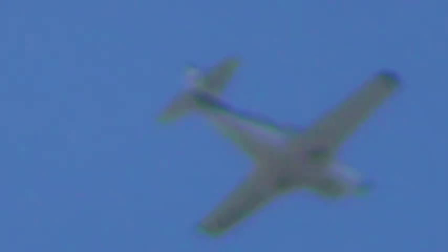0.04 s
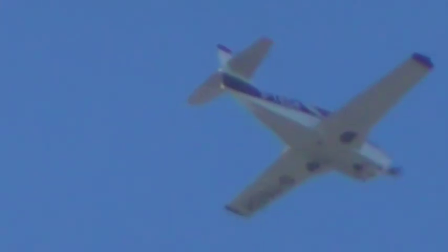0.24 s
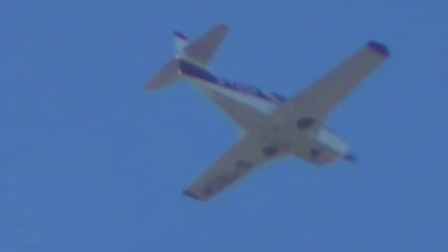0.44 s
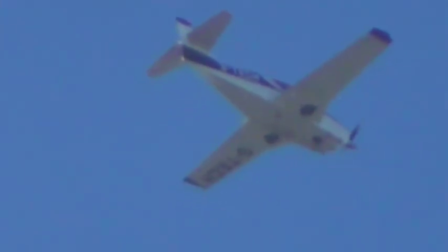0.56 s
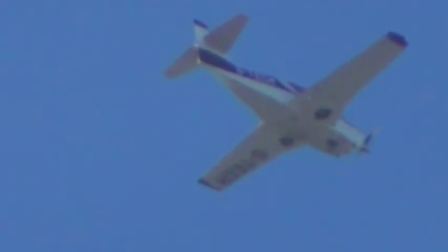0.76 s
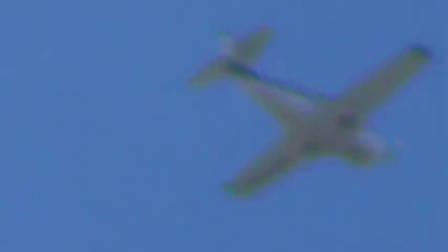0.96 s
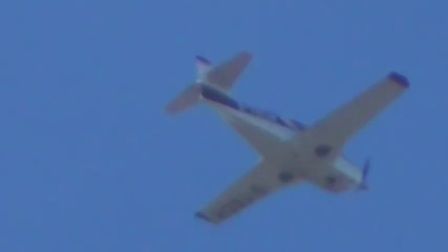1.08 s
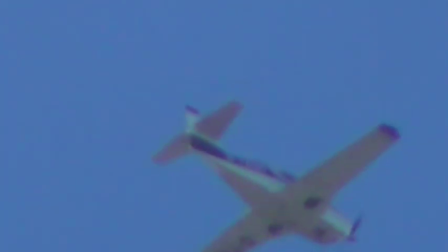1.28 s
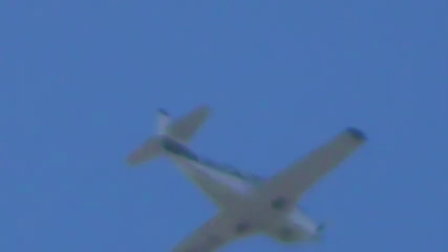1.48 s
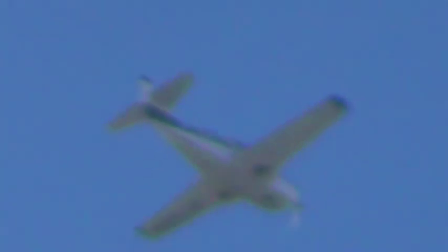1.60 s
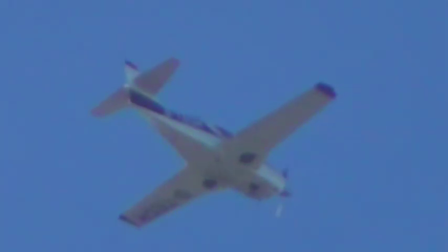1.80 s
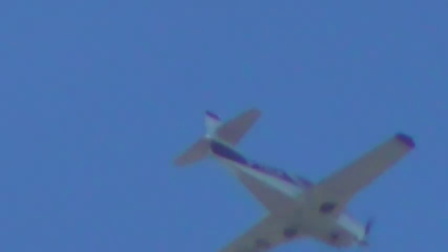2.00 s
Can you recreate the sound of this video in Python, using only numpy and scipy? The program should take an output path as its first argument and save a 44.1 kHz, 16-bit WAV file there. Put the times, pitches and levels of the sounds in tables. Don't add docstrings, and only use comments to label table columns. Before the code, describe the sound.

A small piston propeller plane drones overhead throughout, a nearly constant low buzzing hum with a broad, soft roar, barely dropping in pitch. Wind thumps and rumbles against the camera microphone, strongest from 0 to 0.6 seconds, with another burst around 0.85 to 1.1. Afterwards the drone stands clear, with small low bumps near the end at 2 seconds. Faint lens motor ticks, leaf hiss and electronic hiss lie underneath.

```python
import sys
import numpy as np
from scipy import signal
from scipy.fft import rfft, irfft, next_fast_len
from scipy.io import wavfile
from scipy.ndimage import uniform_filter1d, map_coordinates

SR = 44100
rng = np.random.default_rng(int(sys.argv[2]) if len(sys.argv) > 2 else 0)


def field_ratio(decibels):
    return 10 ** (np.asarray(decibels, dtype=float) / 20)


def int16_out(signal):
    q = np.round(np.clip(np.atleast_2d(signal).T, -1, 1) * 32767)
    wavfile.write(sys.argv[1], SR, q.astype(np.int16))


N = 89964
TIME = np.arange(N) / SR

# pitch_hz, level_db per Hz
HISS_COLOR = [(3000, -30), (6500, 0.5), (8000, 3), (11000, -1), (16000, -2.5)]
# start_s, level_db
LEAF_LEVEL = [(0, -71), (.55, -69), (.72, -65), (.78, -63), (.83, -64.5), (.9, -60), (.97, -61),
              (1.02, -62), (1.08, -65), (1.2, -62.5), (1.33, -62.5), (1.4, -63), (1.6, -67.5), (1.9, -65.5),
              (2.04, -61)]
# pitch_hz, level_db per Hz
LEAF_COLOR = [(2000, -23), (3500, -7.5), (5500, -10), (7500, -11), (9000, -20), (12000, -28), (16000, -52)]

# start_s, dull_peak_db, bright_peak_db
MOTOR_KNOCKS = [(.0503, -49, -66), (.1745, -48, -68), (.194, -47, -66), (.2184, -51, -61), (.24, -48, -63),
                (.2795, -41, -63), (.2985, -51, -63), (.319, -41, -63), (.34, -56, -61), (.3594, -47, -62),
                (.379, -55, -60), (.3975, -54, -61), (.4184, -54, -60), (.5217, -57, -61),
                (.5931, -49, -63), (.6185, -50, -60), (.7355, -47, -65), (.8483, -48, -66),
                (.8887, -47, -60), (.9303, -43, -62), (.95, -49, -62), (.97, -49, -64), (1.01, -44, -56),
                (1.0303, -39, -57), (1.0494, -51, -60), (1.1882, -54, -56), (1.4202, -52, -58),
                (1.5065, -53, -59), (1.608, -50, -58), (1.9644, -56, -50), (2.0073, -52, -56)]
# dull_peak_db, bright_peak_db
STEP_LEVELS = [-58, -69]
# pitch_hz, level_db
BODY_MODES = [(2100, -7), (2600, -7), (3100, -9), (3550, -9), (4000, -11), (4500, -16), (5100, -19)]
# pitch_hz, level_db
SHELL_MODES = [(5800, -13), (6500, -10), (7400, -8), (8200, -11), (9300, -16)]

# start_s, large_eddy_level_db, deep_swell_over_that_db
GUSTS = [(0.0, -38, 7), (0.04, -28, -12), (0.15, -26.5, -9), (0.21, -20, -17), (0.36, -32, -3),
         (0.43, -35, -19), (0.48, -22.5, -9), (0.57, -24, -11), (0.61, -55, 11), (0.65, -36, -27),
         (0.68, -52, -17), (0.94, -32, -17), (1.42, -45.5, -24), (1.68, -37.5, -8), (1.74, -38, -19),
         (1.98, -41, -7), (2.0, -46, -20), (2.04, -54, -6)]
# pitch_hz, level_db per Hz
SWELL_COLOR = [(10, -11), (25, -17), (42, -12), (60, -7.5), (100, -32), (200, -90)]
RUMBLE_COLOR = [(30, -36), (55, -5), (80, 4), (140, -4), (220, -12), (400, -28.5), (1000, -61), (2000, -90)]
FLUTTER_COLOR = [(40, -23), (100, 0.5), (180, 0.5), (300, -2), (500, -8), (800, -20.5), (1500, -29),
                 (3000, -95)]
# center_s, level_db, width_s
PUFFS = [(.05, -36, 0.15), (.145, -26, 0.047), (.22, -26, 0.031), (.29, -28.5, 0.095), (0.339, -30, 0.035),
         (.45, -28, 0.028), (.505, -31.5, 0.038), (0.559, -21.5, 0.073), (.66, -37, 0.032),
         (.795, -39, 0.034), (.87, -28, 0.026), (.91, -25, 0.041), (.97, -25.5, 0.11), (1.02, -40, 0.047),
         (1.06, -40, 0.037), (1.135, -25.5, 0.011)]
# center_s, pitch_hz, peak_db
SLAPS = [(0.016, 64, -33), (0.046, 99, -25.5), (0.081, 112, -25.5), (0.107, 145, -26.5),
         (0.118, 69, -27.5), (0.143, 133, -25.5), (0.145, 53, -31), (0.159, 231, -28.5),
         (0.188, 113, -23), (0.218, 91, -20.5), (0.244, 79, -29), (0.263, 137, -24.5),
         (0.297, 172, -29), (0.312, 113, -26), (0.329, 52.5, -29.5), (0.335, 172, -29),
         (0.337, 243, -27.5), (0.376, 170, -31.5), (0.39, 118, -29), (0.432, 85.2, -33),
         (0.445, 140, -25.5), (0.448, 214, -33), (0.498, 118, -30.5), (0.5, 193, -36),
         (0.516, 284, -35), (0.538, 96, -33), (0.55, 276, -22.5), (0.567, 131, -25),
         (0.658, 123, -32.5), (0.753, 156, -29), (0.803, 152, -36), (0.867, 175, -35),
         (0.896, 115, -29.5), (0.906, 253, -28.5), (0.91, 341, -29.5), (0.925, 106, -30.5),
         (0.955, 167, -28), (0.964, 282, -32), (1.006, 180, -26.5), (1.012, 242, -28),
         (1.028, 145, -26), (1.056, 218, -38), (1.189, 139, -34.5), (1.666, 150, -37),
         (1.72, 158, -39), (1.77, 159, -36), (1.933, 154, -30), (2.003, 102, -32),
         (.025, 130, -27), (0.051, 304, -37), (.062, 70, -30), (.09, 75, -31), (.23, 170, -33.5),
               (.99, 190, -29), (1.042, 170, -37), (1.062, 238, -33), (.94, 192, -31), (0.099, 298, -35.5),
               (.245, 306, -33), (.58, 190, -26.5), (0.866, 366, -33.5), (0.941, 300, -36),
               (.979, 424, -32.5), (0.986, 233, -31.5), (.72, 268, -36)]

# start_s, cycle_hz
ENGINE_SPEED = [(0, 18.8), (2.04, 18.68)]
# multiple of the engine cycle, level_db
ENGINE_ORDERS = [(3, -20), (4, -5), (5, -12), (6, 0), (7, -2), (8, 4), (9, -1), (10, -11), (11, -4),
                 (12, -3), (13, -10), (14, -11), (15, 1), (16, -3), (20, -8), (29, -10), (34, -10),
                 (37, -8), (40, -11), (54, -13)]
# multiple, center_s, gain_db, half_width_s
FOCUS = [(37, .07, 7, .1), (29, .12, 6, .12), (29, .89, 8, .12), (40, .95, 9, .1), (37, 1.0, 7, .04),
         (54, 1.14, 7, .07), (34, 1.21, 7, .06), (37, 1.22, 10, .05), (37, 1.39, 10, .13),
         (40, 1.48, 10, .05), (34, 1.52, 9, .12), (54, 1.7, 7, .06), (6, .7, 3, .2), (8, 1.7, 4, .3),
         (8, .8, 3, .2)]
# pitch_hz, level_db per Hz
ROAR_COLOR = [(20, -23), (150, 0), (400, -3), (700, -1.5), (1050, -3.5), (1350, -11), (3300, -27.5),
              (7000, -55)]
# pitch_hz, left_minus_right_db
PLANE_BALANCE = [(60, 0), (300, 0), (500, -0.5), (750, 3.5), (1140, 4.5), (1740, 4.5), (2650, 3),
                 (3300, -0.5)]
# pitch_hz, likeness (1 = same)
ROAR_ALIKE = [(100, .97), (500, 0.93), (1500, 0.89), (2200, 0.88), (3300, 1)]


def unit(x):
    return x / np.sqrt(np.mean(x ** 2) + 1e-20)


def along(points, hz):
    f, v = np.transpose(points)
    return np.interp(np.log(hz + 1), np.log(f + 1), v)


def curves(rows):
    s, *columns = np.transpose(rows)
    return [np.interp(TIME, s, column) for column in columns]


def wobble(rate_hz):
    return map_coordinates(rng.standard_normal(400), [np.arange(N) * rate_hz / SR])


def filtered(x, response):
    m = next_fast_len(N + 8192)
    return irfft(rfft(x, m) * response(np.fft.rfftfreq(m, 1 / SR)), m)[..., :N]


def rush(color, alike, patchy_db):
    noise = signal.stft(rng.standard_normal((2, N)), nperseg=512)[2]
    patches = uniform_filter1d(rng.standard_normal(noise.shape[1:]), size=5, axis=0)
    patches = uniform_filter1d(patches, size=10, axis=1)
    pair = signal.istft(noise * field_ratio(patchy_db * unit(patches)), nperseg=512)[1][:, :N]

    def middle_and_side(hz):
        angle = np.arccos(np.clip(along(alike, hz), -1, 1)) / 2
        return field_ratio(along(color, hz)) * [np.cos(angle), np.sin(angle)]

    middle, side = filtered(pair, middle_and_side)
    return unit(np.array([middle + side, middle - side]))


def preamp_hiss():
    return field_ratio(-67.5) * rush(HISS_COLOR, [(7700, 0.96), (8500, 0.45), (12000, 0.2)], patchy_db=-0.5)


def leaves():
    level_db = curves(LEAF_LEVEL)[0] + 0.63 * wobble(11.95)
    return field_ratio(level_db) * rush(LEAF_COLOR, [(7700, 0.99), (8500, 0.32)], patchy_db=1.8)


def knock(modes):
    t = np.arange(800) / SR
    t60_s, rise_s, detune_share = .012, .0006, .035
    shape = field_ratio(-60 * t / t60_s) * (1 - np.exp(-t / rise_s))
    hz, mode_db = np.transpose(modes)[:, :, None]
    detune, scatter_db, phase = rng.standard_normal((3, len(modes), 1))
    pitch_hz = hz * (1 + detune_share * detune)
    ring = field_ratio(mode_db + scatter_db) * np.sin(2 * np.pi * (pitch_hz * t + phase))
    return shape * ring.sum(axis=0)


def lens_motor():
    step_hz, first_step_s, gain_db = 49.9, .0193, 7.5
    steps = [(s, *STEP_LEVELS) for s in np.arange(first_step_s, N / SR, 1 / step_hz)]
    out = np.zeros(N + SR)
    for s, dull_db, bright_db in MOTOR_KNOCKS + steps:
        for db, modes in ((dull_db, BODY_MODES), (bright_db, SHELL_MODES)):
            ring = field_ratio(db + gain_db) * knock(modes)
            out[round(s * SR):][:len(ring)] += ring
    return out[:N]


def slaps():
    gain_db, apart, apart_hz = 2, 0.85, 263
    t = np.arange(-2000, 2000) / SR
    out = np.zeros((2, N + SR))
    for s, hz, db in SLAPS:
        phase, direction = rng.standard_normal(2)
        gap = apart * min(hz / apart_hz, 1) ** 2 * np.sign(direction)
        skew = gap * np.array([[.5], [-.5]])
        life_s = .005 + .6 / hz
        swing = np.exp(-(t / life_s) ** 2) * np.sin(2 * np.pi * (hz * t + phase) + skew)
        out[:, round(s * SR):][:, :len(t)] += field_ratio(db + gain_db) * swing
    return out[:, 2000:2000 + N]


def deep_swell():
    strength_db, deep_db = curves(GUSTS)
    return field_ratio(strength_db + deep_db) * rush(SWELL_COLOR, [(40, 0.9)], patchy_db=-0.5)


def large_eddies():
    calm_db = -43
    strength_db = curves(GUSTS)[0]
    strength = np.sqrt(np.clip(field_ratio(2 * strength_db) - field_ratio(2 * calm_db), 1e-8, None))
    rumble = rush(RUMBLE_COLOR, [(50, 0.94), (300, 0.97)], patchy_db=-1.2)
    return strength * unit(field_ratio(1.2 * wobble(24.9)) * rumble)


def small_eddies():
    power = sum(field_ratio(2 * db) * np.exp(-(2 * (TIME - s) / width_s) ** 2) for s, db, width_s in PUFFS)
    flutter = rush(FLUTTER_COLOR, [(100, 0.65), (500, 0.13)], patchy_db=2.4)
    uneven = unit(field_ratio(1.5 * wobble(40.4)) * flutter)
    return np.sqrt(power) * uneven * field_ratio([[-1.4], [1.4]])


def wind():
    stream_db = -8
    return deep_swell() + field_ratio(stream_db) * (large_eddies() + small_eddies()) + slaps()


def engine_turns():
    return 2 * np.pi * np.cumsum(curves(ENGINE_SPEED)[0]) / SR


def focus_db(k):
    extra_db = 3.5 * (k > 20)
    total_db = 0
    for multiple, s, gain_db, width_s in FOCUS:
        if round(multiple) == k:
            total_db = total_db + (gain_db + extra_db) * np.exp(-((TIME - s) / width_s) ** 2)
    return total_db


def engine():
    turns, tones = engine_turns(), np.zeros(N)
    for k, db in ENGINE_ORDERS:
        level_db = db + focus_db(k) + 0.56 * wobble(3.91)
        phase = 2 * np.pi * rng.random() + 0.14 * wobble(5.7)
        tones += field_ratio(level_db) * np.sin(k * turns + phase)
    return field_ratio(-39.5) * unit(tones)


def propeller_roar():
    throb = 1 + 0.069 * np.sin(2 * engine_turns())
    return field_ratio(-35) * rush(ROAR_COLOR, ROAR_ALIKE, patchy_db=.4) * throb


def aircraft():
    def path(hz):
        balance_db = along(PLANE_BALANCE, hz) * [[.5], [-.5]]
        echo_db = 2.5 * np.exp(-((hz - 1620) / 250) ** 2)
        return field_ratio(balance_db + echo_db)

    return filtered(engine() + propeller_roar(), path)


def scene():
    return preamp_hiss() + leaves() + lens_motor() + wind() + aircraft()


def roll_off(x):
    return signal.sosfilt(signal.butter(12, 15740, fs=SR, output="sos"), x)


def record(dry):
    return roll_off(dry)


dry = scene()
out = record(dry)
int16_out(out)
```